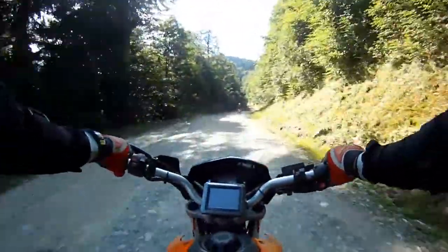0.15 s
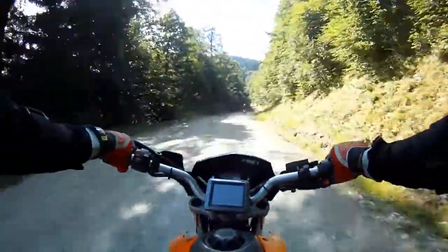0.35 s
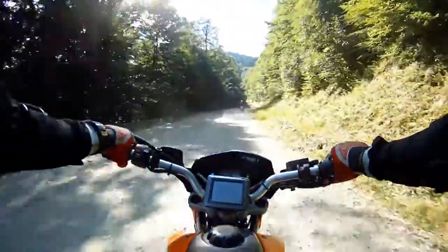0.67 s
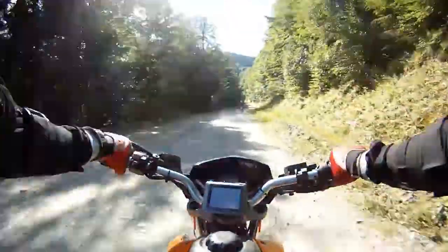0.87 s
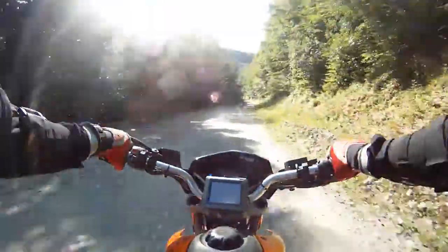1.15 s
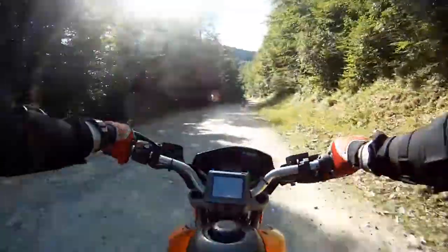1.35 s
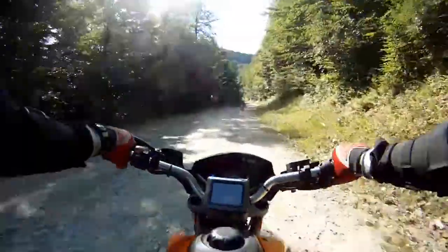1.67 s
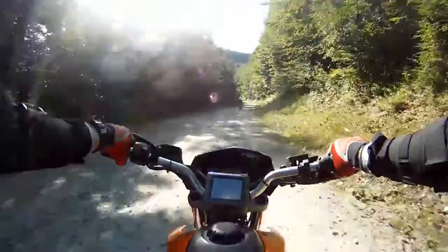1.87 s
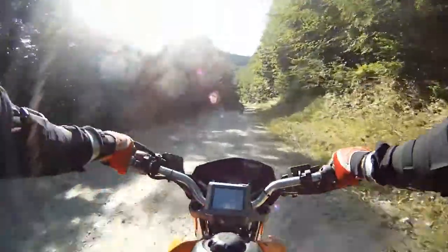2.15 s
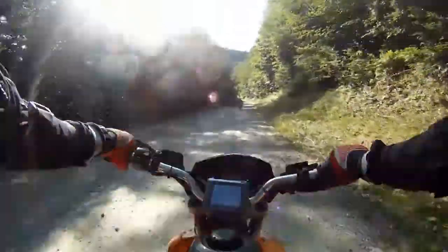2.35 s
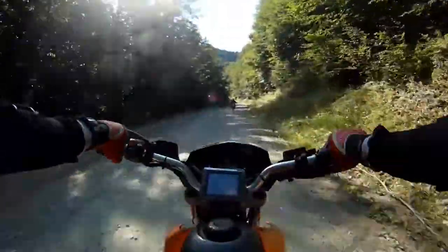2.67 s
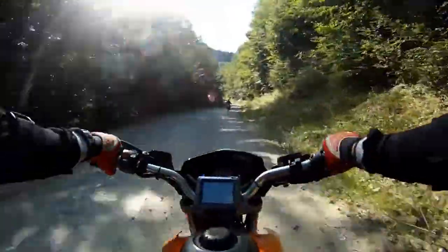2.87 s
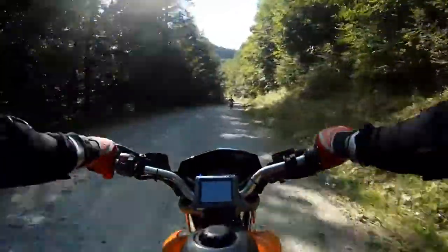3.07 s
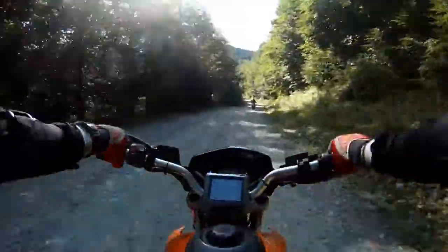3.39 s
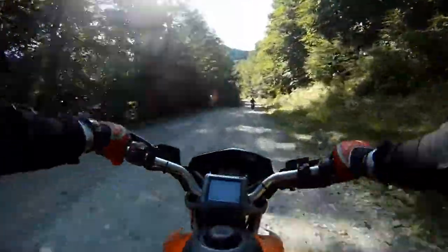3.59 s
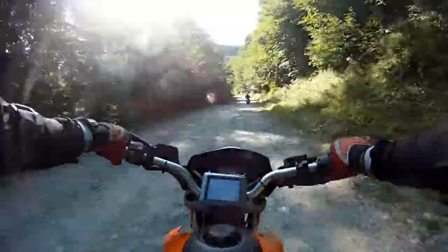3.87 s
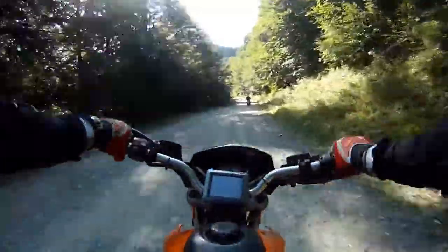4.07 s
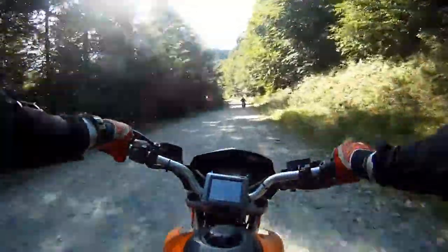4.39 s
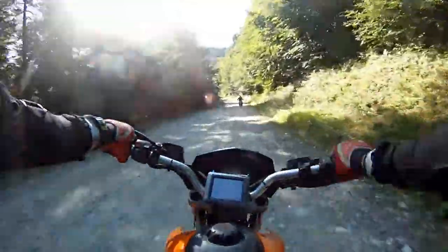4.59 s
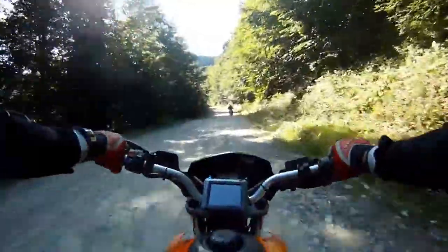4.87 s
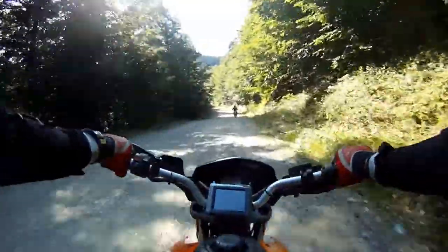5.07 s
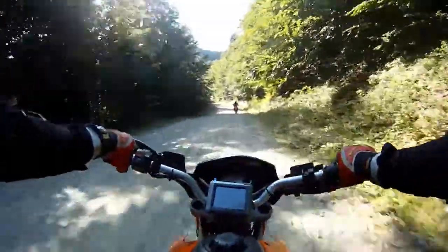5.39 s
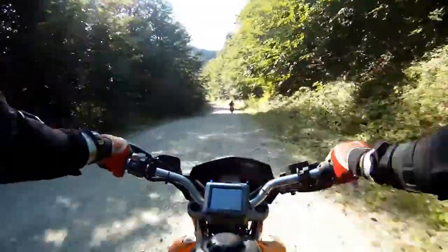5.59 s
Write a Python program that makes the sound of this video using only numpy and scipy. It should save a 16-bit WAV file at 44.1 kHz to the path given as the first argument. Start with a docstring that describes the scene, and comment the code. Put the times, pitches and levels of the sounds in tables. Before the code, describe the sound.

A single-cylinder motorcycle rides for nearly six seconds on a gravel forest road, heard through a microphone sealed in a plastic camera case on the rider. The exhaust is a low, fluttering buzz, firing about 32 times a second at first and creeping to 36, with tapping engine clatter and a boxy mid-range tyre roar that grow slightly; fine gravel crunch lies faintly on top. Low, lumpy wind rumbles throughout. Dry ticks come at 0.05 s, then a cluster of hollow plastic knocks from 0.12 to 0.45 s. After a thinner gap, knocks return at 1.2 s and continue irregularly, several per second, each with short chatter and a low thump; stronger ones fall near 1.55, 3.5, 3.85 and 4.7 s. Deep wind buffets begin around 1.1 s, the heaviest near 1.75 and 2.75 s. From 2.6 s, tiny rough high squeaks slip in. The gritty, dry sound ends mid-ride.

```python
"""From the start a single-cylinder motorcycle gathers a little speed on a gravel forest road.
We hear it inside the closed plastic case of a camera on the rider: exhaust harmonics, engine taps
and tyre noise are coloured by the case, over a low rumble of wind made from filtered noise.
Dry ticks of noise come almost at once, then knocks of the case on its mount, as dying modes with chatter.
After about a second buffets of wind join in, and from the middle on the mount squeaks on a rough sine."""
import sys
import numpy as np
from scipy import signal
from scipy.fft import rfft, irfft, next_fast_len
from scipy.io import wavfile

SR = 44100
rng = np.random.default_rng(int(sys.argv[2]) if len(sys.argv) > 2 else 0)


def transcribe(u):
    """Save the signal u as a 16-bit wav file named by the first command-line argument.

    u: samples, shape (n,) or (channels, n), limited to [-1, 1]; the rate is SR.
    q: integer samples, one column per channel.
    """
    v = np.clip(np.atleast_2d(u).T, -1, 1)
    q = np.round(v * 32767).astype(np.int16)
    wavfile.write(sys.argv[1], SR, q)


N = 253134  # length in samples
TIME = np.arange(N) / SR  # s
BINS = np.fft.rfftfreq(N, 1 / SR)  # Hz

# Engine speed: t/s, firing rate/Hz
ENGINE_SPEED = [(0.0, 31.6), (0.34, 32.1), (1.18, 32.6), (1.29, 33.5), (1.42, 32.5), (1.93, 33.2),
                (2.43, 33.0), (2.7, 34.0), (3.1, 33.2), (3.32, 33.9), (3.88, 33.9), (4.2, 34.9),
                (4.78, 34.9), (4.94, 35.8), (5.42, 35.8), (5.74, 36.0)]
# Exhaust note: multiple of the firing rate, level/dB (rms before it wavers)
EXHAUST_HARMONICS = [(1, -54.5), (2, -46.5), (3, -51), (4, -49.5), (5, -56), (6, -55.5), (7, -52.5),
                     (8, -52.5), (9, -53), (10, -59.5), (11, -71), (13, -60.5), (16, -94.5), (19, -85),
                     (22, -91), (28, -67)]
# Resonances of the case as the engine drives them: f/Hz, width/Hz, relative level/dB
ENGINE_RESONANCES = [(2070, 720, -8.5), (2237, 99, 4.5), (2260, 130, -14.5), (2503, 96, -6.5),
                     (2718, 55, -14), (3010, 41, -14), (3186, 235, -14), (3480, 170, -19.5)]
# Resonances of the case as the tyres drive them: f/Hz, width/Hz, relative level/dB
ROAD_RESONANCES = [(477, 143, -5), (623.4, 66, 4), (737, 316, -5), (936, 67, -5), (1217, 103, -13.5),
                   (1403, 195, -7.5)]
# Colour of crunching gravel: f/Hz, relative level/dB
GRAVEL_COLOUR = [(1000, -52), (2600, -0.5), (3400, 4), (3800, -7.5), (3950, -0.5), (4400, 3), (4700, -1),
                 (5150, 0), (5600, -11.5), (6000, -13.5)]
# Knocks of the case on its mount: t/s, blow level/dB, low thump level/dB, crack level/dB, crack f/Hz
# (knocks() trims the three levels)
KNOCK_EVENTS = [(0.123, -20, -23.5, -23, 1550), (0.133, -28, -21.5, -30, 1600),
                (0.145, -18, -25.5, -26.5, 1410), (0.258, -23, -45, -34, 1320),
                (0.264, -20, -31, -30, 1430), (0.442, -23, -29, -28.5, 1455),
                (0.792, -43, -31.5, -49, 1430), (1.237, -19.5, -23.5, -23, 1496),
                (1.38, -16, -32.5, -25.5, 1560), (1.553, -8, -22.5, -17, 1550),
                (1.755, -18.5, -24.5, -25.5, 1670), (2.014, -17, -20.5, -43, 1385),
                (2.095, -30, -36, -48, 1370), (2.256, -15, -21, -28.5, 1540),
                (2.477, -44, -22.5, -28.5, 1550), (2.49, -13, -22, -39, 1470),
                (2.732, -24.5, -26.5, -41, 1510), (3.021, -13.5, -21, -32, 1460),
                (3.149, -12.5, -29, -42, 1354), (3.347, -15.5, -36, -30, 1500),
                (3.524, -5.5, -25, -17.5, 1530), (3.676, -19.5, -31, -33, 1410),
                (3.85, -6.5, -26.5, -21.5, 1460), (4.023, -12.5, -39, -27.5, 1484),
                (4.222, -14.5, -35, -32, 1380), (4.237, -11, -32.5, -26.5, 1476),
                (4.391, -22, -29, -33, 1610), (4.402, -13.5, -40, -46, 1420), (4.446, -21, -53, -50, 1410),
                (4.689, -6, -22, -17.5, 1482), (4.721, -26, -43, -26, 1630), (4.849, -19, -32.5, -31, 1340),
                (4.996, -20.5, -24.5, -26, 1470), (5.05, -28, -42, -36, 1670),
                (5.157, -14.5, -34, -29.5, 1500), (5.325, -12, -35, -30, 1450),
                (5.493, -11.5, -23.5, -24.5, 1520), (5.508, -21, -32.5, -28.5, 1730),
                (5.652, -15.5, -22, -22, 1406)]
# Modes of the case that a knock rings: f/Hz, relative level/dB, t60/s (of the plain decay in ring())
CASE_MODES = [(395, -13.5, .011), (620, -17.5, 0.03), (723, -4.5, 0.009), (878, -16.5, 0.014),
              (1490, -6, 0.0049), (1917, -12.5, 0.017), (2230, -15, 0.0097), (2405, -24.5, 0.0047),
              (3300, -28, 0.0096), (5350, -32.5, 0.0024)]
# Sway of the mount after a knock: f/Hz, relative level/dB, t60/s (of the plain decay in ring())
MOUNT_MODES = [(111.8, 0.5, 0.033), (353, -18, 0.025)]
# Sharpest dry ticks of gravel: t/s, level/dB (ticks() trims it)
TICK_EVENTS = [(0.0543, -31.5), (0.064, -35.5), (1.2375, -33.5), (1.416, -35), (1.4837, -32.5),
               (1.5525, -35), (1.7757, -32), (1.923, -41), (1.9568, -34), (1.9634, -34), (2.4573, -36.5),
               (2.7084, -40), (3.463, -40), (3.697, -36), (3.932, -35.5), (4.7277, -32), (4.7633, -35)]
# Colour of a tick: f/Hz, width/Hz, relative level/dB
TICK_RESONANCES = [(3340, 186, 7.5), (4220, 1100, -8.5)]
# Clearest squeaks of the mount: t/s at the middle, level/dB (peak before roughness), length/s
SQUEAK_EVENTS = [(2.57, -43.5, .034), (2.628, -43.5, .019), (3.551, -43.5, 0.022), (3.61, -46, 0.038),
                 (4.071, -44, 0.02), (4.201, -42, .019), (4.244, -42.5, .028), (4.28, -46, 0.028),
                 (4.468, -40, 0.012), (5.114, -46, 0.024), (5.326, -42, 0.013), (5.551, -43.5, .016)]
# Colour of the wind rumble: f/Hz, relative level/dB
WIND_COLOUR = [(8, -18), (20, 3.5), (29, -0.5), (48, -8.5), (75, -11), (120, -12), (180, -23.5),
               (260, -22.5), (500, -45.5), (1500, -58.5)]
# Heavy buffets of air: t/s, peak level/dB of the eddy's envelope, f/Hz
BUFFET_EVENTS = [(1.09, -29, 30), (1.501, -28, 47), (1.605, -26, 36.5), (1.745, -18, 36.6),
                 (1.93, -34, 36.3), (2.419, -24, 32), (2.743, -20, 32), (3.49, -24, 30), (3.62, -25, 30.3),
                 (4.281, -27, 32), (4.706, -24.5, 35.7)]

CRUISE_HZ = 34.1  # firing rate at which the levels of clatter and tyre roar hold
CRACK_HZ = 1496  # crack pitch at which the case modes keep their listed pitch
REBOUND, REBOUND_S = 0.64, 0.001303  # gain and delay of the second contact
CLOSING_S, SETTLING_S = 0.0066, 0.0075  # chatter swells before the blow and dies after it
CHATTER_DB = -18.5  # chatter level for a knock whose blow and thump are listed at 0 dB
CHATTER_PER_BLOW, CHATTER_PER_THUMP = 0.31, 0.26  # dB of chatter per dB of blow and of thump
CONVERTER_HZ, EDGE_HZ = 12000, 15500  # sample rate of the slow converter, upper edge of the sound


def exhaust(turns, waver=0.13):
    """Harmonics of the firing rate, each wavering as the air stream bends the sound."""
    multiples, db = np.transpose(EXHAUST_HARMONICS)
    out = np.zeros(N)
    for k in range(1, 29):
        level = amp(np.interp(k, multiples, db))  # fills in multiples that are not listed
        strength = level * (1 + waver * drift(rate_hz=7.8))
        phase = 2 * np.pi * (k * turns + rng.random())
        out += strength * np.sqrt(2) * np.cos(phase)
    return out


def clatter(turns, revs, level_db=-42.0, speed_power=2.0, beat=0.23, beat_decay=0.07, valves=0.3):
    """Piston and valve taps peak at each firing and stroke, grow with speed and ring the case."""
    strokes = 4 * turns  # four strokes to each firing
    firing_pulse = beat * np.exp(-(turns % 1) / beat_decay)  # decay as a share of the firing cycle
    stroke_pulse = valves * (1 - strokes % 1) ** 2
    taps = grains(per_s=700, spread_db=3) + rng.standard_normal(N)
    drive = (1 + firing_pulse + stroke_pulse) * taps
    return amp(level_db + speed_power * revs) * unit(colour(drive, humps(ENGINE_RESONANCES)))


def tyres(revs, roar_db=-38.0, speed_power=2.4, patchy_db=-0.1, gravel_db=-55, hiss=1.45):
    """Knobbly treads roar through the case, louder with speed, and loose stones crunch steadily."""
    treads = grains(per_s=900, spread_db=3) + rng.standard_normal(N)
    roar = unit(colour(treads, humps(ROAD_RESONANCES)))
    roar_level = amp(roar_db + speed_power * revs + patchy_db * drift(rate_hz=5.2))
    stones = grains(per_s=400, spread_db=6) + hiss * rng.standard_normal(N)
    crunch = unit(colour(stones, slopes(GRAVEL_COLOUR)))
    return roar_level * roar + amp(gravel_db) * crunch


def knocks(blow_db=-2.5, crack_db=6, thump_db=6.5, split_hz=1200, scatter=0.045, sway_scatter=0.084):
    """The case strikes the mount and rebounds, ringing its modes; the mount sways with a low thump."""
    out, t = np.zeros(N), np.arange(SR // 8) / SR
    for s, blow, thump, crack, crack_hz in KNOCK_EVENTS:
        sway = 1 + sway_scatter * rng.standard_normal()
        stiffness = crack_hz / CRACK_HZ  # a stiffer contact rings higher and rebounds sooner
        contact = np.zeros(len(t))
        for hz, db, t60 in CASE_MODES:
            detune = 1 + scatter * rng.standard_normal()
            # The blow drives the lower modes, the crack the upper ones
            drive_db = blow + blow_db if hz < split_hz else crack + crack_db
            contact += amp(drive_db + db) * ring(t, hz * stiffness * detune, t60)
        add(out, s, contact)
        # The quick second contact gives a hollow colour
        add(out, s + REBOUND_S / stiffness, REBOUND * contact)
        for hz, db, t60 in MOUNT_MODES:
            add(out, s, -amp(thump + thump_db + db) * ring(t, hz * sway, t60))
    return out


def chatter():
    """The case chatters as its play closes before a knock and settles after; heavy knocks chatter more."""
    envelope, t = np.zeros(N), np.arange(-SR // 16, SR // 16) / SR
    swell = np.exp(np.minimum(t / CLOSING_S, -t / SETTLING_S))
    for s, blow, thump, *_ in KNOCK_EVENTS:
        level_db = CHATTER_DB + CHATTER_PER_BLOW * blow + CHATTER_PER_THUMP * thump
        add(envelope, s + t[0], amp(level_db) * swell)
    return envelope * unit(colour(grains(per_s=3400, spread_db=0.5), humps(ROAD_RESONANCES)))


def ticks(trim_db=-1.5, decay_s=0.0034, faint_db=-44.5, faint_count=10):
    """Gravel stones tick against the bike: some sharp bursts of noise, and faint ones at random times."""
    envelope, t = np.zeros(N), np.arange(SR // 20) / SR
    sharp = [(s, db + trim_db) for s, db in TICK_EVENTS]
    faint = [(s, faint_db) for s in rng.uniform(0, N / SR, faint_count)]
    for s, db in sharp + faint:
        add(envelope, s, amp(db) * np.exp(-t / decay_s))
    return envelope * unit(colour(rng.standard_normal(N), humps(TICK_RESONANCES)))


def squeaks(hz=3310, rough=0.16, flutter=0.025, pitch_spread=0.014):
    """Slips of the plastic joint make it sing briefly on a slightly rough, unsteady note."""
    envelope = np.zeros(N)
    for s, db, length in SQUEAK_EVENTS:
        envelope += amp(db) * np.exp(-(2 * (TIME - s) / length) ** 4)
    pitch = hz * (1 + flutter * drift(rate_hz=400) + pitch_spread * drift(rate_hz=28.4))
    note = np.sin(2 * np.pi * np.cumsum(pitch) / SR)
    return envelope * (1 + rough * drift(rate_hz=150)) * note


def wind(level_db=-34.0, lumpy_db=2.5, swell_db=2.5, swell_s=0.11, buffet_t60=0.11):
    """Low, lumpy rumble of the air stream; at a buffet it swells and one large eddy shakes the case."""
    swell = sum(np.exp(-((TIME - s) / swell_s) ** 2) for s, _, _ in BUFFET_EVENTS)
    rumble = colour(rng.standard_normal(N), slopes(WIND_COLOUR))
    eddies = unit(rumble * amp(lumpy_db * drift(rate_hz=5.4)))
    out = amp(level_db + swell_db * swell) * eddies
    t = np.arange(SR // 2) / SR
    for s, db, hz in BUFFET_EVENTS:
        add(out, s, amp(db) * ring(t, hz, buffet_t60))
    return out


def revs_db(speed):
    """How far the engine runs above its cruising speed, in dB."""
    return 20 * np.log10(speed / CRUISE_HZ)


def ring(t, hz, t60):
    """A sine whose envelope swells, peaks at 1 and dies away; t60 belongs to its plain decay."""
    u = np.maximum(t, 0) * np.log(1000) / t60
    return u * np.exp(1 - u) * np.sin(2 * np.pi * hz * t)


def grains(per_s, spread_db):
    """Random clicks, many small and a few large, scaled together to rms 1."""
    size_db = spread_db * np.minimum(rng.exponential(1, N), 4)
    sizes = amp(size_db) * rng.choice([-1, 1], N)
    return unit(sizes * (rng.random(N) < per_s / SR))


def drift(rate_hz):
    """Slow random wandering of rms 1: noise with its fast changes smoothed away."""
    size = next_fast_len(N)
    low_pass = np.exp(-(np.fft.rfftfreq(size, 1 / SR) / rate_hz) ** 2)
    return unit(irfft(rfft(rng.standard_normal(size)) * low_pass, size)[:N])


def colour(x, gain):
    """Filters with a given gain per bin, timed so that ringing follows its cause (minimum phase)."""
    cepstrum = irfft(np.log(np.maximum(gain, 1e-5)), N)
    fold = 1 + np.sign(np.fft.fftfreq(N))  # moves all the ringing to after the cause
    return irfft(rfft(x) * np.exp(rfft(cepstrum * fold)), N)


def humps(resonances):
    """Gain per bin of a set of steep-sided resonances, added as power."""
    power = np.zeros(len(BINS))
    for hz, width, db in resonances:
        power += amp(db) ** 2 / (1 + ((BINS - hz) / width) ** 2 * 2) ** 2
    return np.sqrt(power)


def slopes(points):
    """Gain per bin of a spectrum drawn with straight lines on a log-frequency axis."""
    hz, db = np.transpose(points)
    return amp(np.interp(np.log(BINS + 1), np.log(hz), db))


def curve(rows):
    """A control curve at every sample."""
    return np.interp(TIME, *np.transpose(rows))


def add(mix, s, sound):
    """Mixes a sound in at time s, in seconds."""
    part = mix[max(round(s * SR), 0):][:len(sound)]
    part += sound[:len(part)]


def amp(db):
    """Decibels to gain."""
    return 10 ** (np.asarray(db) / 20)


def unit(x):
    """Scales to rms 1."""
    return x / np.sqrt(np.mean(x ** 2) + 1e-20)


def scene():
    """Engine speed drives exhaust, clatter and tyre roar; all reaches one microphone in the case."""
    speed = curve(ENGINE_SPEED)
    turns = np.cumsum(speed) / SR  # firings so far
    revs = revs_db(speed)
    ride = exhaust(turns) + clatter(turns, revs) + tyres(revs)
    mount = knocks() + chatter() + ticks() + squeaks()
    return (ride + mount + wind())[None]


def record(dry):
    """A slow converter holds each sample, mirroring sound into a gritty treble; then a band limit."""
    slow = signal.resample_poly(dry, CONVERTER_HZ, SR, axis=1)
    steps = np.repeat(slow, 8, axis=1)
    held = signal.resample_poly(steps, SR, 8 * CONVERTER_HZ, axis=1)[:, :N]
    low_pass = signal.firwin(301, EDGE_HZ, window=("kaiser", 9), fs=SR)
    return signal.oaconvolve(held, low_pass[None], "same")


dry = scene()
out = record(dry)
transcribe(out)
```